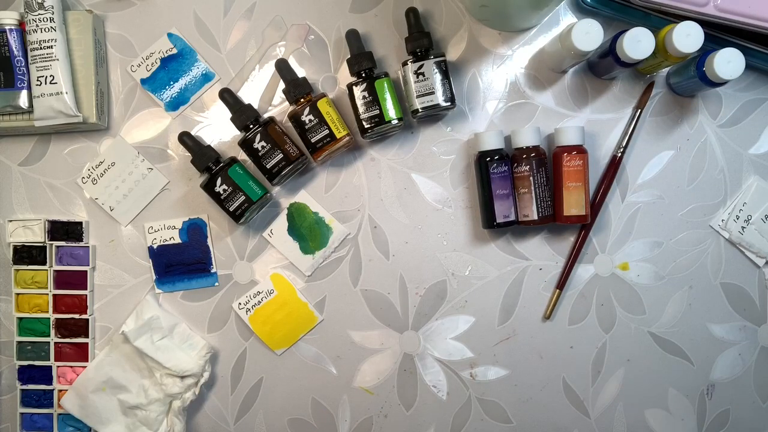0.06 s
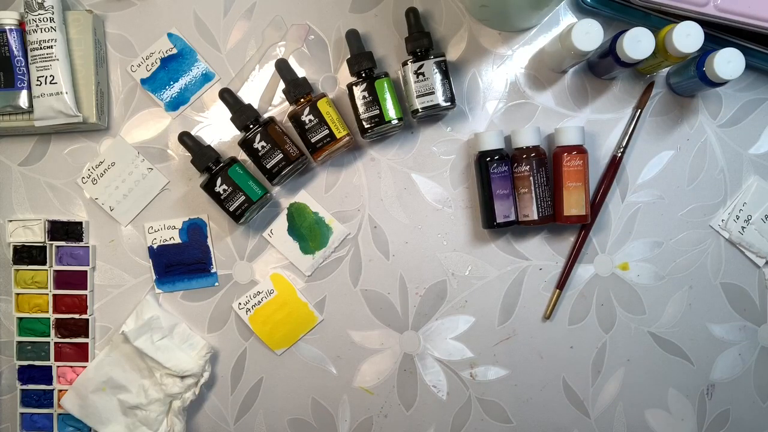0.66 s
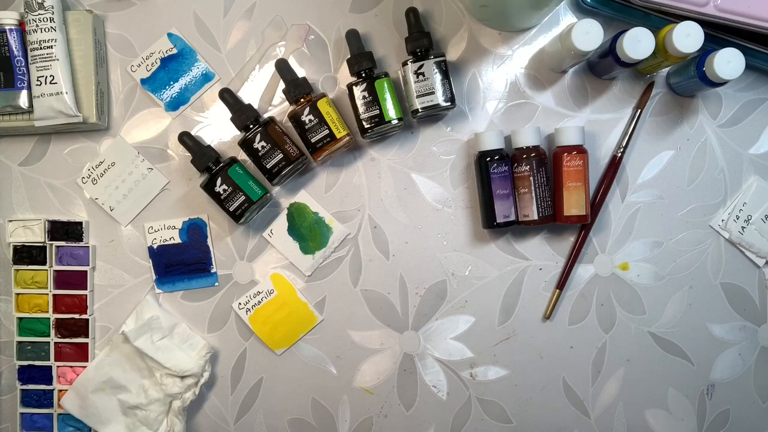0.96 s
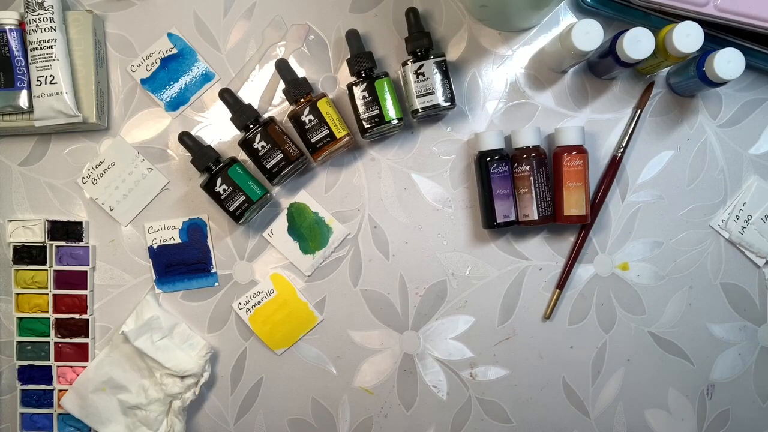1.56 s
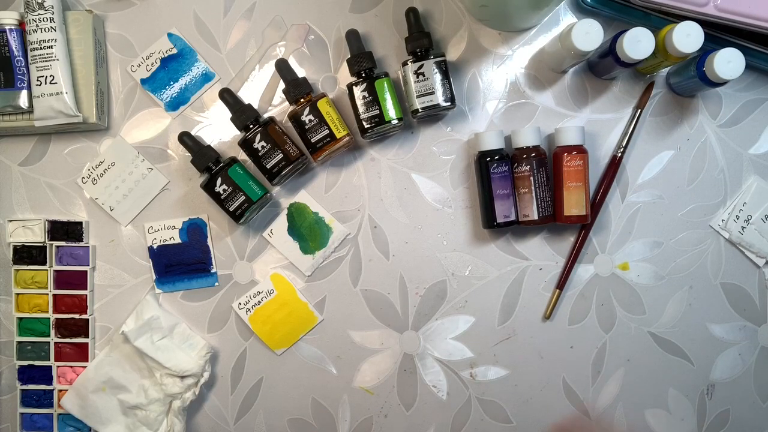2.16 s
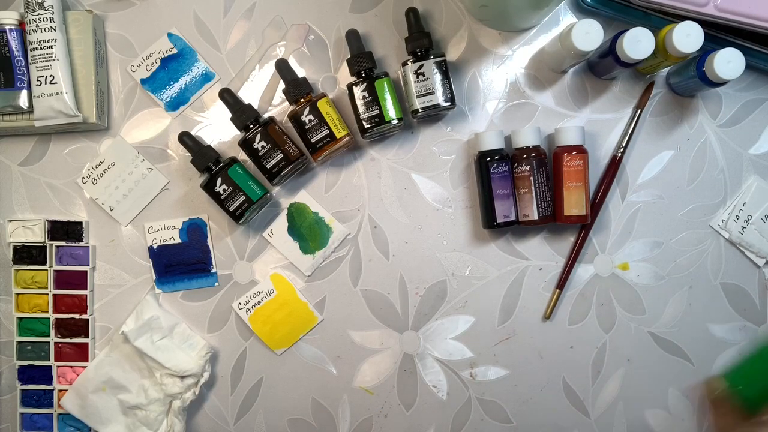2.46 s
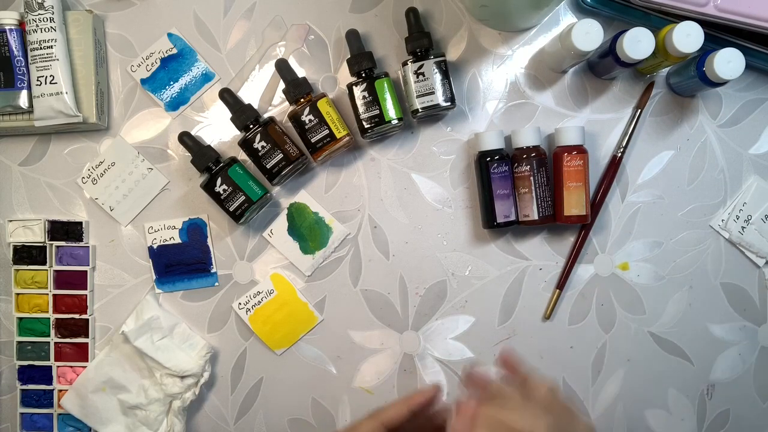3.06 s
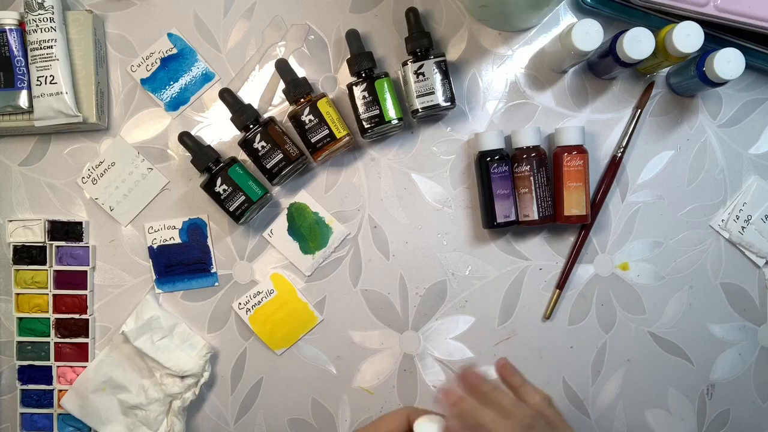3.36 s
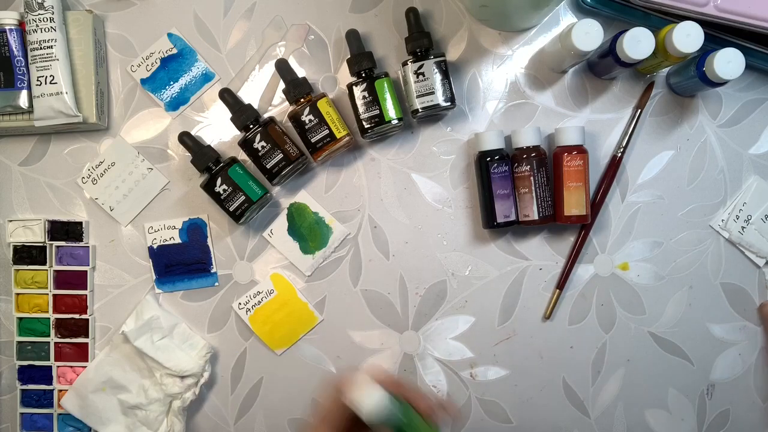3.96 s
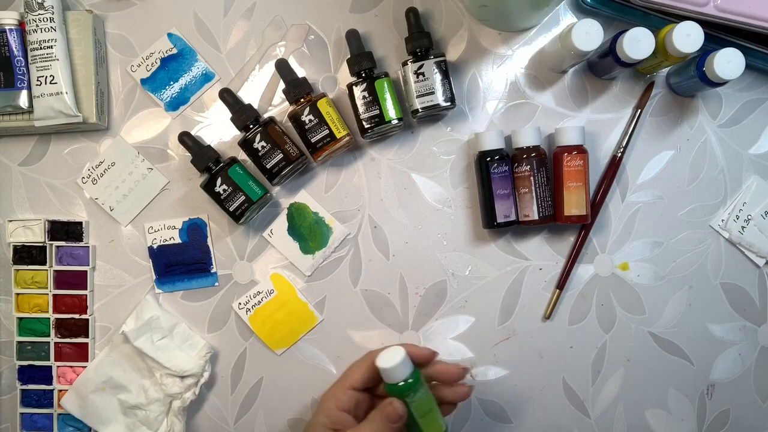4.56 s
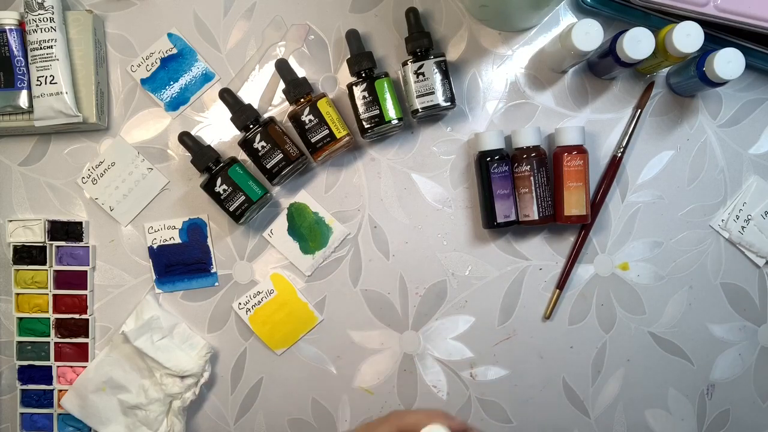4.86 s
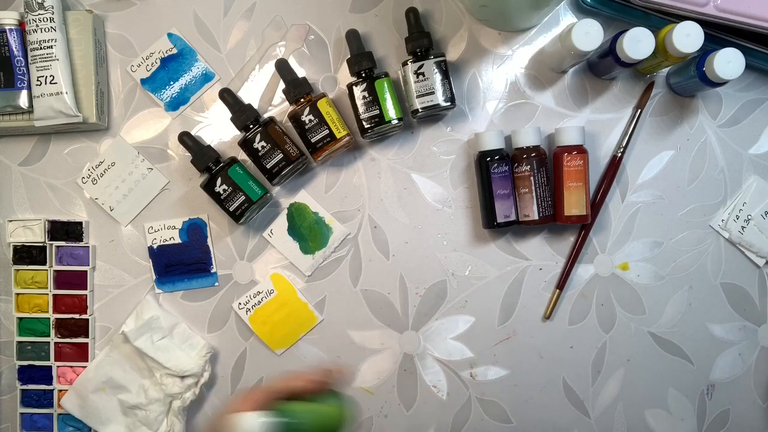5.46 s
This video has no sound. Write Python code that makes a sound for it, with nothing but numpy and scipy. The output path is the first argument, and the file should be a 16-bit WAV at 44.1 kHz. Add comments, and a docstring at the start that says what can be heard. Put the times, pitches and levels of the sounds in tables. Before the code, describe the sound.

A small plastic ink bottle is shaken hard for about three seconds. The mixing ball inside knocks against both ends in a fast, even rattle while the ink sloshes lightly. The shaking stops and the bottle is tipped about, giving scattered softer clacks, small sloshes, a brief rub of fingers and faint bumps on the table. The microphone is close, in a quiet small room.

```python
"""A work table in a small room, a phone's microphone close by. A small plastic ink bottle is shaken hard
for three seconds: the ink sloshes, and the mixing ball skids along the wall and knocks on the two ends
in turn, often bouncing, so that the plastic cracks and rings. Then the bottle is tipped about gently,
the ball clacks on its side and fingers shift their grip. Now and then the hands bump the table."""
import sys
import numpy as np
from scipy import signal
from scipy.fft import rfft, irfft, next_fast_len
from scipy.io import wavfile

SR = 44100
rng = np.random.default_rng(int(sys.argv[2]) if len(sys.argv) > 2 else 0)


def generate_wav(sig):
    """Save sig (samples, or channels by samples) to the path in sys.argv[1] as 16-bit PCM at SR."""
    pcm = np.round(np.clip(np.atleast_2d(sig).T, -1, 1) * 32767).astype(np.int16)
    wavfile.write(sys.argv[1], SR, pcm)


N = 251811
T = np.arange(int(0.3 * SR)) / SR  # time within one hit, s


def undb(db):
    return 10 ** (np.asarray(db) / 20)


def fade(t, t60):
    """Exponential decay, 60 dB down at t60."""
    return np.exp(-np.log(1000) * t / t60)


def lookup(hz, points):
    """Read (pitch_hz, value) points on a log-frequency axis."""
    f, value = np.transpose(points)
    return np.interp(np.log(np.maximum(hz, 1)), np.log(f), value)


def colour(x, points):
    """Causal filter through (pitch_hz, gain_db) points."""
    n = 2 * next_fast_len(x.shape[-1] // 2 + 1)
    gain = undb(lookup(np.fft.rfftfreq(n, 1 / SR), points))
    cepstrum = irfft(np.log(gain))
    cepstrum[1:n // 2] *= 2
    cepstrum[n // 2 + 1:] = 0
    return irfft(rfft(x, n) * np.exp(rfft(cepstrum)))[..., :x.shape[-1]]


def stereo_noise(size, likeness):
    """Left and right noise whose correlation is likeness."""
    mid, side = rng.standard_normal((2, size))
    return (np.sqrt(1 + likeness) * mid + np.sqrt(1 - likeness) * np.array([side, -side])) / np.sqrt(2)


def attack_level(x, db, attack_s=0.005):
    """Scale a hit so that its attack has this rms level."""
    return x * undb(db) / np.sqrt(np.mean(x[:, :int(attack_s * SR)] ** 2))


def add(track, s, x):
    """Mix x into the track at time s."""
    start = int(np.clip(s * SR, 0, N - 1))
    track[:, start:start + x.shape[1]] += x[:, :N - start]


# The still room at the microphone: pitch_hz, gain_db
ROOM_TONE_SPECTRUM = [(25, -2), (45, -4.5), (70, -5.5), (115, 0.5), (170, -14.5), (350, -12.5), (700, -21),
                      (1500, -18.5), (4000, -20), (15000, -26)]
def room_tone(level_db=-76):
    """Faint steady rumble and hiss."""
    noise = colour(stereo_noise(N, likeness=0.52), ROOM_TONE_SPECTRUM)
    return noise * undb(level_db) / noise.std()


# Ink on the move, close up, and at 4.79-4.95 s a rustle as fingers re-grip the bottle: start_s, end_s,
# splashes_per_s, level_db
SLOSHES = [(0, 2.98, 47, -47.5), (3.752, 4.2, 310, -59.5), (4.79, 4.95, 190, -55.5),
           (4.951, 5.7, 200, -63.5)]
def ink(lowest_hz=950, highest_hz=5500, ring_cycles=18, range_db=16, treble_db=9, size=1400):
    """Tiny splashes: each a fizz of spray and a bubble that rises in pitch as it dies."""
    out, t = np.zeros((2, N)), T[:size]
    for start, end, rate, db in SLOSHES:
        for when, softness, smallness in rng.random((int((end - start) * rate), 3)):
            hz = lowest_hz * (highest_hz / lowest_hz) ** smallness
            bubble = fade(t, ring_cycles / hz) * np.sin(2 * np.pi * hz * t * (1 + 6 * t))
            spray = fade(t, 0.029) * stereo_noise(size, likeness=1)
            gain = undb(db - range_db * softness + treble_db * smallness)
            add(out, start + when * (end - start), gain * (bubble + spray))
    return low_cut(out, hz=664.5, order=2)


def low_cut(x, hz, order):
    """A small body radiates almost no bass."""
    return signal.sosfilt(signal.butter(order, hz, "high", fs=SR, output="sos"), x)


# The ball rubbing along the wall: pitch_hz, gain_db
SKID_SPECTRUM = [(600, -15.5), (1400, -10), (2600, -3), (3800, 2), (6000, 0.5), (9000, -13), (15000, -17)]
def skid(db, swell_s=0.04, size=900):
    """A short rub that swells as the ball gathers speed."""
    rub = colour(stereo_noise(size, likeness=0.44), SKID_SPECTRUM)
    return undb(db) * rub / rub.std() * fade(T[:size], swell_s)[::-1]


# The hard contact of ball on plastic: pitch_hz, gain_db
CRACK_SPECTRUM = [(400, -23.5), (800, -22.5), (1500, -12.5), (3500, -2.5), (6500, 5), (8500, 3), (11500, 2),
                  (13700, 4), (15500, 0.5)]
def crack(snap_t60=0.0065, chatter_t60=0.026, chatter_db=-12, size=1800):
    """A snap at contact, then the dense, quickly damped high modes of the plastic."""
    envelope = fade(T[:size], snap_t60) + undb(chatter_db) * fade(T[:size], chatter_t60)
    return colour(envelope * stereo_noise(size, likeness=1), CRACK_SPECTRUM)


def ring(modes, detune, spread_rad, count, size=1800):
    """Each mode rings as a cluster of count partials; pitch and stereo phase vary from hit to hit."""
    hz, t60, db = np.repeat(modes, count, axis=0).T
    place = (np.arange(len(hz)) % count + rng.random(len(hz))) / count  # 0-1 across the cluster
    hz = hz * (1 + detune * (2 * place - 1))
    sign, skew = rng.standard_normal((2, len(hz)))
    gains = np.sign(sign) * undb(db) * np.exp(1j * spread_rad * np.array([skew, -skew]))
    poles = np.exp((2j * np.pi * hz - np.log(1000) / t60) / SR)
    return (gains @ np.vander(poles, size, increasing=True)).imag


def struck_at(modes, spot_hz, boost_db, octaves=0.2):
    """Modes near the pitch of the struck spot are driven hardest."""
    hz, t60, db = np.transpose(modes)
    nearness = np.exp(-(np.log2(hz / spot_hz) / octaves) ** 2)
    return np.transpose([hz, t60, db + boost_db * nearness])


# Modes of the filled bottle's side wall, shell and high ping: pitch_hz, t60_s, level_db
WALL_MODES = [(1010, 0.017, -13), (1287, 0.023, -8.5), (1630, .02, -7), (1994, 0.029, -7),
              (2565, .024, 1.5), (2900, 0.024, 3)]
SHELL_MODES = [(3412, 0.051, -0.5), (3802, 0.034, 0.5), (4400, 0.019, 6), (4900, 0.034, 1),
               (5554, 0.023, 0.5), (6400, 0.048, -4.5)]
PING_MODES = [(9300, .02, 0), (9860, 0.039, -1), (10555, 0.03, 3.5)]
def knock(db, wall_db, crack_db, ping_db, spot_hz):
    """The ball sets the bottle ringing; contact spot and moving ink shift the modes each time."""
    wall = ring(struck_at(WALL_MODES, spot_hz, boost_db=6), detune=0.11, spread_rad=0.63, count=5)
    shell = ring(struck_at(SHELL_MODES, spot_hz, boost_db=7), detune=0.07, spread_rad=0.636, count=5)
    ping = ring(PING_MODES, detune=0.055, spread_rad=0.1, count=6)
    parts = [(wall, wall_db - 1.5), (shell, -0.93), (ping, ping_db - 0.5), (crack(), crack_db + 1.5)]
    return undb(db) * sum(attack_level(part, part_db) for part, part_db in parts)


def blow(s, db, spot_hz, wall_db, contact, seating=0):
    """Time and tone of one knock: hard blows, and glancing ones that ring the wall, crack more."""
    crack_db, ping_db = contact
    force_db = db + 30  # above a usual blow
    crack_db += 0.2834 * force_db + 0.15 * wall_db
    ping_db += (seating - 0.14) * force_db
    return s, db, wall_db, crack_db, ping_db, spot_hz


# Forward strokes: the ball hits the bottom, then again as it seats. wall_db is relative to level_db.
# start_s, level_db, spot_hz, wall_db, rebound_after_s, rebound_db
BOTTOM_KNOCKS = [(0.0205, -23, 4700, -13.5, 0.007, -29.5), (0.2527, -21.5, 4530, -10, 0.0042, -26.5),
                 (0.4798, -25, 4900, -10.5, 0.008, -28), (0.7067, -21, 5170, -12.5, 0.0043, -26.5),
                 (0.934, -21, 4900, -13.5, .004, -31.5), (1.16, -22, 4750, -9, .0082, -31),
                 (1.3875, -24.5, 4900, -15, 0.0064, -24), (1.6144, -20.5, 4400, -8.5, 0.011, -34),
                 (1.8416, -27, 4300, -10.5, 0.0053, -24.5), (2.0578, -25.5, 4510, -2.5, .0082, -34),
                 (2.284, -23.5, 4400, -9, 0.0068, -26.5), (2.5112, -21, 5200, -10, 0.007, -28),
                 (2.7216, -29.5, 4700, -14.5, 0.0091, -24), (2.9356, -21.5, 5100, -15.5, 0.0093, -25.5)]
# Return strokes, on the cap end: start_s, level_db, spot_hz, wall_db
CAP_KNOCKS = [(0.1356, -29.5, 2750, 1.5), (0.3645, -31, 2660, 4.5), (0.5939, -28.5, 2450, 1.5),
              (0.815, -29, 4330, 1), (1.0574, -30, 4400, 0), (1.284, -31, 2900, 9), (1.5005, -31, 3050, 5),
              (1.7184, -24, 4380, -6.5), (1.9447, -26, 3220, -0.5), (2.1605, -25, 4310, -1),
              (2.3864, -25, 4140, -5.5), (2.6093, -24.5, 4960, -1.5), (2.84, -24.5, 2380, -0.5)]
# Clacks on the side, between strokes and as the bottle tips: start_s, level_db, spot_hz, wall_db
SIDE_KNOCKS = [(0.4604, -42, 4700, -2), (0.8325, -36.5, 4100, -3.5), (1.0243, -36.5, 2570, 4.5),
               (1.113, -40.5, 2560, 1.5), (1.2522, -33, 3900, -1), (1.328, -37, 2800, 0.5),
               (1.4681, -35.5, 4040, -1), (1.5549, -33.5, 4830, -5.5), (2.0757, -37, 3700, -3),
               (2.0929, -33, 3700, -7), (2.787, -35.5, 3800, -13), (2.8146, -37, 2900, 1),
               (3.0016, -36, 3770, -6), (3.0812, -33, 3320, -1), (3.2265, -51.5, 3400, 0),
               (3.433, -49.5, 2810, 0.5), (3.4483, -49, 2840, 9), (3.739, -31, 2550, 1.5),
               (3.873, -33.5, 3880, -4.5), (3.9806, -26, 2980, 2), (4.0643, -32, 3400, -10),
               (4.0744, -32, 4900, -13), (4.1181, -41, 4300, -5), (4.2102, -36, 2760, 3.5),
               (4.2807, -54.5, 3610, -3), (4.4235, -55, 2850, 5), (4.7741, -47, 3400, -13),
               (4.7904, -44, 4430, -16), (4.8607, -37.5, 3620, 0), (4.8774, -38.5, 2900, 3.5),
               (5.0164, -60, 2480, 10.5), (5.128, -42.5, 2700, 3.5), (5.1625, -29.5, 2950, 3),
               (5.2687, -40, 2774, 0.5), (5.285, -41, 3500, -4), (5.376, -48, 3507, -1),
               (5.4049, -30.5, 3620, -5.5), (5.409, -32, 5130, -4), (5.551, -44, 2650, 3),
               (5.6436, -36.5, 2710, 3), (5.668, -42, 2720, -7)]
def ball_path(shake_s=3.0, rattles_per_s=3, graze_lead_s=0.023, graze_db=-52):
    """Every blow of the ball: cap, side, graze, bottom, rebound, and faint chance rattles."""
    bottom, rebound, cap, side = (-0.57, -8.5), (3.2, -2.5), (3.3, -5), (0, -10.5)  # crack_db, ping_db
    blows = [blow(*hit, cap) for hit in CAP_KNOCKS] + [blow(*hit, side) for hit in SIDE_KNOCKS]
    for s, db, spot_hz, wall_db, after_s, rebound_db in BOTTOM_KNOCKS:
        blows.append(blow(s - graze_lead_s, graze_db, spot_hz, 0, side))
        blows.append(blow(s, db, spot_hz, wall_db, bottom))
        # a strong rebound lands squarely and pings much more
        blows.append(blow(s + after_s, rebound_db, spot_hz, wall_db, rebound, seating=1.57))
    for when, force, spot in rng.random((int(rattles_per_s * shake_s), 3)):
        db = np.interp(force, (0, 1), (-48, -43))
        spot_hz = np.interp(spot, (0, 1), (2450, 3900))
        blows.append(blow(when * shake_s, db, spot_hz, 0, side))
    return blows


def ball(blows, skid_db=-13.5):
    """The mixing ball skids into each knock."""
    out = np.zeros((2, N))
    for s, db, *timbre in blows:
        rub = skid(db + skid_db)
        add(out, s - rub.shape[1] / SR, rub)
        add(out, s, knock(db, *timbre))
    return low_cut(low_cut(out, hz=834, order=4), hz=150, order=2)


def bottle(spots=4):
    """Ball and ink near the microphone; the bottle moves, so knocks reach the room from several spots."""
    blows = ball_path()
    parts = [ball(blows[spot::spots]) for spot in range(spots)] + [ink()]
    return sum(room(part, near_db=-5, near_t60=0.015, tail_db=-5.4) for part in parts)


# Hands against the table: start_s, thud_db, pat_db
HAND_BUMPS = [(.69, -64, -65), (.77, -63, -76), (.93, -66, -63), (3.781, -54.5, -66), (3.836, -58, -57.5),
              (3.877, -59, -73), (4.822, -57.5, -62), (4.928, -60, -58), (4.969, -60, -72),
              (5.031, -53.5, -67)]
# The boom of the table under the bottle: pitch_hz, t60_s, level_db
BOOM_MODES = [(42, .2, -13.5), (88, 0.1, -6), (111.1, 0.29, -3), (131.3, 0.061, -7.5), (191, .04, -14)]
# Skin on the table top: pitch_hz, gain_db
PAT_SPECTRUM = [(120, -37.5), (310, -2.5), (480, -7), (900, -8.5), (1800, -10), (5000, -42.5)]
def table(push_s=0.003, jog_lag_s=0.015):
    """A soft hand pats the top and sets it booming; each forward stroke jogs it through the arm."""
    out = np.zeros((2, N))
    jogs = [(s + jog_lag_s, -72.5, -65.5) for s, *_ in BOTTOM_KNOCKS]  # columns as in HAND_BUMPS
    for s, thud_db, pat_db in HAND_BUMPS + jogs:
        boom = ring(BOOM_MODES, detune=0.043, spread_rad=0, count=1, size=len(T))
        boom *= 1 - np.exp(-T / push_s)  # the hand takes a moment to load the table
        pat = colour(stereo_noise(len(T), likeness=0.54) * fade(T, 0.102), PAT_SPECTRUM)
        add(out, s, undb(thud_db + 2) * boom / np.abs(boom).max() + attack_level(pat, pat_db))
    return out


# Fingers shifting their grip, close up: pitch_hz, gain_db
GRIP_SPECTRUM = [(400, -28), (950, -8.5), (1500, -25), (2800, -15), (3700, -0.5), (4700, -15), (7000, -8),
                 (15000, -17)]
def fingers(start_s=4.768, rise_s=0.031, t60_s=0.18, level_db=-51):
    """Skin slides over the plastic: a soft hiss that swells and dies."""
    out = np.zeros((2, N))
    rub = colour(stereo_noise(len(T), likeness=0.55), GRIP_SPECTRUM)
    envelope = np.minimum(T / rise_s, 1) * fade(np.maximum(T - rise_s, 0), t60_s)
    add(out, start_s, undb(level_db) * envelope * rub / rub.std())
    return out


# How long the small room rings: pitch_hz, t60_s
ROOM_DECAY = [(300, 0.1), (800, 0.15), (2100, 0.27), (4000, 0.28), (9000, 0.22), (15000, 0.089)]
# The tone of its tail, heard from the table: pitch_hz, gain_db
TAIL_SPECTRUM = [(100, -0.5), (1000, 1.5), (3500, -2), (7000, -1), (10500, -2), (15000, 6)]
def room(x, near_db, near_t60, tail_db, length_s=0.36):
    """Direct sound, quick scatter from the table top and the things on it, then the tail of the room."""
    t = np.arange(int(length_s * SR)) / SR
    hz = np.fft.rfftfreq(len(t), 1 / SR)
    spectrum = rfft(stereo_noise(len(t), likeness=0.71))
    tail = 0
    for band_hz, t60 in ROOM_DECAY:
        band = lookup(hz, [(f, f == band_hz) for f, _ in ROOM_DECAY])
        tail = tail + irfft(spectrum * band, len(t)) * fade(t, t60)
    tail = colour(tail * (t > 0.005), TAIL_SPECTRUM)
    near = stereo_noise(len(t), likeness=0.49) * fade(t, near_t60) * (t > 0.001)
    reflections = [(near_db, near), (tail_db, tail)]
    response = sum(undb(db) * part / np.sqrt(np.sum(part ** 2) / 2) for db, part in reflections)
    response[:, 0] += 1  # direct sound
    return signal.fftconvolve(x, response, axes=1)[:, :N]


def scene():
    """The bottle a little left of the microphone, the hands and the table under it, the quiet room."""
    shaken = bottle() * undb([[-0.07], [-0.93]])  # left_db, right_db
    hands = room(table() + fingers(), near_db=-8.5, near_t60=0.03, tail_db=-8)
    return shaken + hands + room_tone()


# How far the microphone's right channel trails its left: pitch_hz, lag_rad
RIGHT_LAG = [(0, 0), (500, 0), (1000, 1.1), (2000, 5.6), (3100, 10), (4400, 15.7), (6300, 25.1),
             (7900, 31.7), (9200, 31.2), (11500, 31.8), (16000, 34.4)]
def record(dry, top_hz=15800):
    """The phone, close in: its right channel lags by a pitch-dependent amount, and the top is cut."""
    lag = np.interp(np.fft.rfftfreq(2 * N, 1 / SR), *np.transpose(RIGHT_LAG))
    right = irfft(rfft(dry[1], 2 * N) * np.exp(-1j * lag))[:N]
    top_cut = signal.ellip(10, 0.2, 70, top_hz, fs=SR, output="sos")
    return signal.sosfilt(top_cut, np.array([dry[0], right]))


dry = scene()
out = record(dry)
generate_wav(out)
```